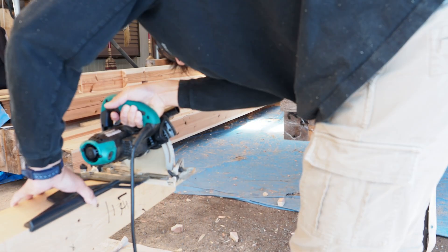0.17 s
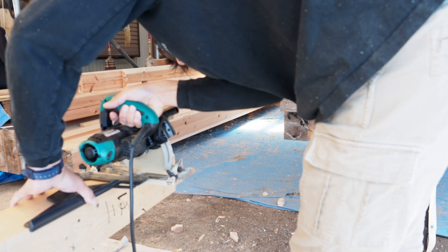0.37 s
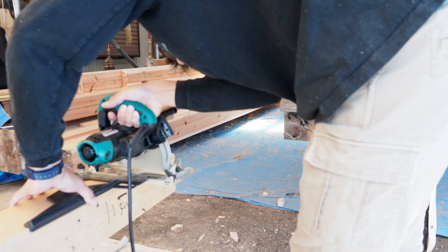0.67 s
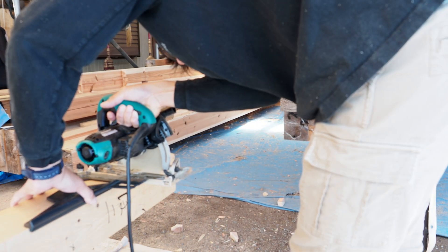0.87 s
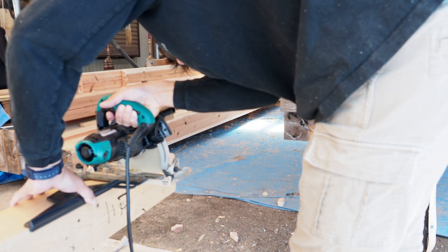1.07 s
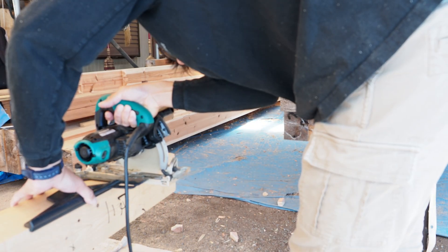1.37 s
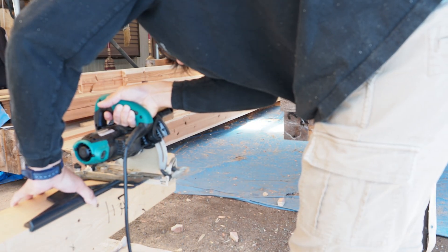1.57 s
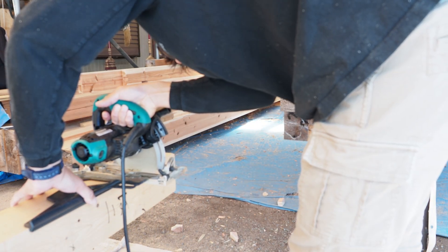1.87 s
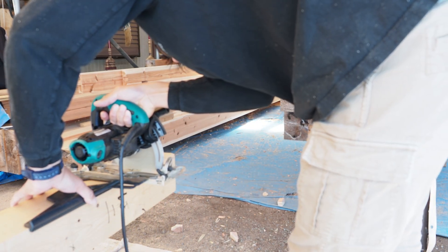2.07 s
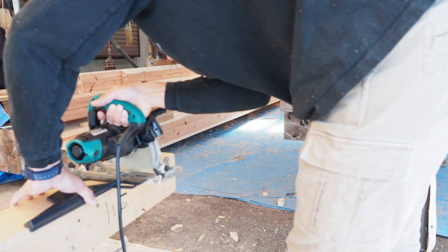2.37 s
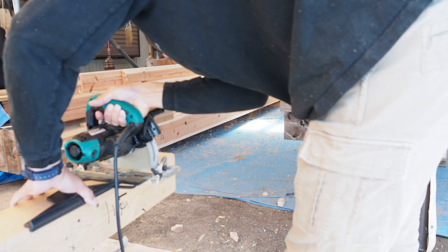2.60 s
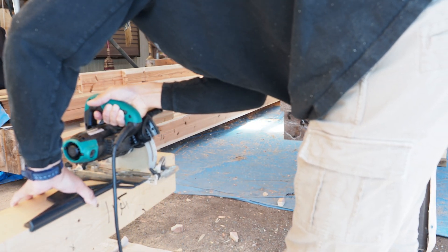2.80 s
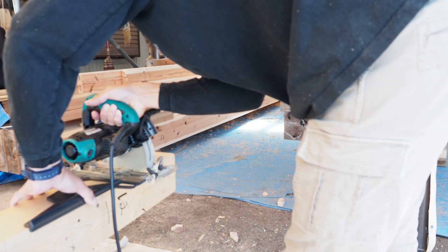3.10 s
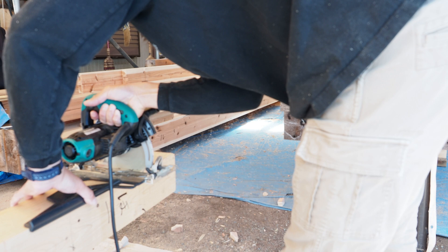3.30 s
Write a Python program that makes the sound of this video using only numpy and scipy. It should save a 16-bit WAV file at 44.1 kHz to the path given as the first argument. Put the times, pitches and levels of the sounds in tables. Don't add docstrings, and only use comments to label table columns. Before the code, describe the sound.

A circular saw cuts timber, close up in an open workshop. Quiet air and a tiny far clink last 0.1 s, then the saw enters abruptly at full speed. Dense roar, steady motor and gear whine near 430 Hz and sharp hiss continue. Pitch sags barely from 1.7 s; thin blade squeals come around 1.5 and 1.8-2.6 s. Near 3.35 s it speeds up slightly, chirping at 3.43 s, ending without winding down.

```python
import sys
import numpy as np
from scipy import signal
from scipy.fft import rfft, irfft
from scipy.io import wavfile
from scipy.ndimage import uniform_filter1d

SR = 44100
rng = np.random.default_rng(int(sys.argv[2]) if len(sys.argv) > 2 else 0)


def store_wav(level_fs):
    pcm = np.round(np.clip(np.atleast_2d(level_fs), -1, 1) * 32767)
    wavfile.write(sys.argv[1], SR, pcm.T.astype(np.int16))


def rack_gain(trim_db):
    fader = np.asarray(trim_db, float)
    return 10 ** (fader / 20)


N = 152145
GEAR_RATIO = 6.487
PRESS_TURN = -.19


def rms_one(x):
    return x / np.sqrt(np.mean(x ** 2) + 1e-20)


def drift(rate_hz):
    step = 40
    r = np.exp(-2 * np.pi * rate_hz * step / SR)
    noise = rng.standard_normal(N // step + 2002)
    slow = signal.lfilter([1], [1, -2 * r, r * r], noise)[2000:]
    return np.interp(np.arange(N) / step, np.arange(len(slow)), rms_one(slow))


def resonance(x, hz, width_hz):
    r = np.exp(-np.pi * width_hz / SR)
    top = [(1 - r * r) / 2, 0, (r * r - 1) / 2]
    return signal.lfilter(top, [1, -2 * r * np.cos(2 * np.pi * hz / SR), r * r], x)


def colour(noises, spectrum, patchy_db):
    hz, db = np.transpose(spectrum)
    edges = 25 * 2 ** np.arange(0, 9.5, 1 / 3)
    out = 0
    for k, (low, high) in enumerate(zip(edges, edges[1:])):
        band_pass = signal.butter(2, [low, high], "band", fs=SR, output="sos")
        band = signal.sosfilt(band_pass, noises[k % 2])
        band_db = np.interp(np.log(low * high) / 2, np.log(hz), db)
        out = out + band * rack_gain(band_db + patchy_db * drift(36.0))
    return rms_one(out)


def each_turn(turns, share, draw):
    size = 660
    share = np.clip(share, 0, 1)
    place = (turns % 1 * size).astype(int)
    return np.sqrt(1 - share) * draw(N) + np.sqrt(share) * draw(size)[place]


def wobble(turns, late):
    return np.cos(2 * np.pi * (turns - late))


# time in seconds, armature speed in Hz.
SPEED = [(0, 433), (1.05, 433.1), (1.2, 433.6), (1.62, 433.6), (1.72, 431.6), (2.5, 431.7), (2.6, 432.7),
         (2.9, 432.7), (3.0, 432.1), (3.3, 432.1), (3.38, 436), (3.45, 436)]


def blade_turns(t):
    return np.cumsum(np.interp(t, *np.transpose(SPEED))) / SR / GEAR_RATIO


# time in seconds, depth from 0 to 1.
DEPTH = [
    (0, 0),
    (1.3, .1),
    (1.9, .85),
    (2.4, 1),
    (3.2, .9),
    (3.35, .7),
]


def buried_depth(t):
    return np.interp(t, *np.transpose(DEPTH))


# time in seconds, roar in dB, bite of the teeth in dB, boom of the beam in dB.
FEED = [(0.1, -36, -43, -7), (0.13, -36.5, -40.5, -1), (0.34, -37, -41, -0.5), (0.46, -35.5, -37, -1),
        (0.65, -37, -42.5, -0.5), (1.1, -36.5, -39.5, -1), (1.2, -36.5, -41, 1.5), (1.53, -36.5, -38, 0),
        (1.71, -36.5, -42, -2.5), (1.77, -35.5, -38, -4), (1.86, -37, -41.5, 0.5),
        (1.92, -35.5, -40.5, -3.1), (3.0, -37, -40, -0.5), (3.13, -37, -38.5, 1), (3.24, -38, -37.5, -1),
        (3.37, -39.5, -43.5, 2.5), (3.42, -38, -41.5, 0), (3.45, -34.5, -39, -1)]


def feed(t):
    s, *columns = np.transpose(FEED)
    return [np.interp(t, s, column) for column in columns]


# multiple of the armature speed, level in dB, dB more when buried.
WHINE = [(1, -58.5, 0), (4, -57.5, 0), (5, -66, 0), (7, -60, 2), (8, -62, 5), (9, -63, 2), (10, -62, 3),
         (11, -66, -3), (12, -64, -2), (15, -65, 0), (16, -63, 0), (18, -66, -3), (31, -64, 4)]
# multiple of the blade speed, level in dB, dB more when buried.
TURN_TONES = [(2, -88, 0), (3, -87, 0), (16, -62, 0), (23, -60, 1), (45, -64, 4), (53, -67, 6),
              (55, -64, -5), (57, -64, 1), (66, -64, 4), (87, -64, -3), (91, -63, -4), (92, -63, -4),
              (93, -65, -4), (98, -69, 4), (107, -64, -4), (112, -65, 3), (121, -63, -6), (130, -62, -3),
              (131, -56, -2), (144, -65, -2), (149, -64, 0), (151, -66, 1), (155, -66, 0), (165, -62, -2),
              (166, -67, 2), (181, -63, 0), (190, -66, 6)]
WHINE_WAVER_DB, SHAFT_WAVER_DB, GEAR_WAVER_DB = 1.4, 1.5, 2.5
GEAR_UP_DB, GEAR_DOWN_DB, MESH_SIDE_DB = -67, -75, -11


def motor(turns, depth):
    def tone(cycles, db, waver_db):
        return np.sqrt(2) * rack_gain(db + waver_db * drift(2.7)) * np.sin(2 * np.pi * cycles)

    shaft = GEAR_RATIO * turns
    out = tone(shaft, WHINE[0][1], SHAFT_WAVER_DB)
    out = out + tone(shaft + turns, GEAR_UP_DB, GEAR_WAVER_DB)
    out = out + tone(shaft - turns, GEAR_DOWN_DB, GEAR_WAVER_DB)
    for k, db, deep_db in WHINE[1:]:
        mesh = 1 + 2 * rack_gain(MESH_SIDE_DB) * wobble(turns, rng.random())
        out = out + mesh * tone(k * shaft, db + deep_db * depth, WHINE_WAVER_DB)
    for k, db, deep_db in TURN_TONES:
        out = out + tone(k * turns + rng.random(), db + deep_db * depth, WHINE_WAVER_DB)
    return out


# pitch in Hz, level in dB per Hz.
ROAR = [(30, -31), (110, -35.5), (330, -19.5), (650, -5.5), (1100, -3.5), (5700, -7), (9000, -7),
        (16000, -29)]
# pitch in Hz, width in Hz, level
# in dB, dB more when buried.
BODY = [(477, 60, 5, 0), (570, 58, -5, -0.5), (733, 190, 7, 0.5), (1091, 81, 6, 2), (1540, 200, 2.5, 4),
        (1850, 300, 5, -2.5), (228.5, 39, 6.5, 0.5), (2490, 370, 2.5, 2), (2926, 71, 7, 3),
        (3270, 240, 6.5, -2), (3025, 30, 1.5, 3.5), (4590, 255, 4, 0), (7720, 330, 3, -2.5),
        (9100, 140, 5, 1.5),
        (1270, 120, -2.5, 3.5), (2507, 26, 0.5, -0.5), (3540, 130, -0.5, 4.5), (3770, 65, 0.3, 2.5),
         (4310, 87, 4.5, -0.5), (6180, 85, -0.5, 2), (6730, 87, -2.5, 9.5), (6750, 200, 1.3, -13),
         (7400, 110, 0.5, 3.5)]
ROAR_REPEAT, ROAR_TURN = .07, -.07
ROAR_PATCH_DB, ROAR_WOBBLE_DB, BODY_DRIFT_DB = 0.5, .65, .4
BOOM_HZ = 1690


def roar(turns, depth, boom_db):
    noises = [each_turn(turns, ROAR_REPEAT, rng.standard_normal) for _ in "ab"]
    air = colour(noises, ROAR, ROAR_PATCH_DB)
    for hz, width_hz, db, deep_db in BODY:
        gain = rack_gain(db + deep_db * depth + BODY_DRIFT_DB * drift(1.0))
        air = air + (gain - 1) * resonance(air, hz, width_hz)
    low = signal.sosfilt(signal.butter(1, BOOM_HZ, fs=SR, output="sos"), air)
    air = air + (rack_gain(boom_db) - 1) * low
    return rms_one(air) * rack_gain(ROAR_WOBBLE_DB * wobble(turns, ROAR_TURN) + 0.57 * drift(23))


CHIPS_PER_S, CHIP_SPREAD_DB = 6000, 3


def chips(count):
    sizes_db = CHIP_SPREAD_DB * np.minimum(rng.exponential(1, count), 4.5)
    sizes = rack_gain(sizes_db) * rng.choice([-1, 1], count)
    return rms_one(sizes * (rng.random(count) < CHIPS_PER_S / SR))


# pitch in Hz, width in Hz.
BLADE = [(8730, 250), (10000, 400), (10600, 300), (11000, 250), (11700, 300), (12050, 250), (12620, 220),
         (12950, 300), (13350, 350), (14300, 700), (15200, 700)]
# level in dB, dB more when buried.
BLADE_DB = [(1, -2.5), (-7, -11), (-5, 3.5), (-4.5, 5), (-3, 3), (3, 1), (0.5, 1.5), (-7.5, 13),
            (-2.5, 4.5), (-3, 2), (-19, -11)]
REPEAT_SHARE, STEADIED = 0.077, .85
WOBBLE_DB, TWICE_DB, BLADE_DRIFT_DB = 3.5, 1.5, 1
TWICE_TURN = -.27


def blade(turns, depth):
    once_db = WOBBLE_DB * (1 - STEADIED * depth) * wobble(turns, PRESS_TURN)
    twice_db = TWICE_DB * wobble(2 * turns, 2 * TWICE_TURN)
    press = rack_gain(once_db + twice_db + 0.92 * drift(43))
    press = press / np.sqrt(uniform_filter1d(press ** 2, size=2640))
    strikes = [press * each_turn(turns, REPEAT_SHARE, chips) for _ in "ab"]
    out = 0
    for k, ((hz, width_hz), (db, deep_db)) in enumerate(zip(BLADE, BLADE_DB)):
        gain = rack_gain(db + deep_db * depth + BLADE_DRIFT_DB * drift(2.9))
        out = out + gain * resonance(strikes[k % 2], hz, width_hz) / np.sqrt(width_hz)
    return rms_one(out)


# start in
# seconds, length in seconds, multiple of the blade speed, level in dB.
SQUEALS = [(1.42, .18, 159, -49), (1.42, .18, 165, -51), (1.4, .2, 161, -54), (1.4, .2, 156, -55),
           (1.82, .45, 181, -50), (1.75, .45, 189, -55), (2.27, .38, 189, -52), (-.1, 1.0, 49, -56),
           (.4, .1, 49, -54), (.85, 1.0, 49, -53), (2.92, .26, 24, -50), (1.05, .25, 23, -55),
           (3.31, .125, 8 * GEAR_RATIO, -47), (2.58, .22, 8 * GEAR_RATIO, -56), (1.8, 1.45, 44.5, -55),
           (.3, 1.2, 45, -59)]
THROB_ABOVE = 100
SQUEAL_BEAT, SQUEAL_BLUR, SQUEAL_FLUTTER_DB = .5, .5, 1.5


def squeals(turns):
    t, out = np.arange(N) / SR, 0
    for s, length, k, db in SQUEALS:
        high = k > THROB_ABOVE
        swell = np.sin(np.pi * np.clip((t - s) / length, 0, 1))
        throb = 1 + high * SQUEAL_BEAT * wobble(turns, PRESS_TURN)
        level = rack_gain(db + SQUEAL_FLUTTER_DB * drift(20))
        note = np.sin(2 * np.pi * k * turns + high * SQUEAL_BLUR * drift(12))
        out = out + swell * level * throb * note
    return np.sqrt(2) * out


# start in seconds, length in seconds, pitch in Hz, level in dB.
CHIRPS = [
    (3.431, .012, 5200, -41),
    (3.439, .016, 5050, -44),
    (3.438, .009, 7500, -44),
]
CHIRP_FALL_PER_S = 3.5


def chirps():
    t, out = np.arange(N) / SR, 0
    for s, length, hz, db in CHIRPS:
        age = np.clip(t - s, 0, length)
        swell = np.sin(np.pi * age / length)
        cycles = hz * age * (1 - CHIRP_FALL_PER_S * age / 2)
        out = out + rack_gain(db) * swell * np.sin(2 * np.pi * cycles)
    return np.sqrt(2) * out


# pitch in Hz, level in dB, seconds to fade by 60 dB.
CLINK = [(3510, -64, .14), (4090, -76, .15), (4680, -71, .3)]
CLINK_S = .064


def clink():
    age = np.arange(N) / SR - CLINK_S
    out = 0
    for hz, db, t60 in CLINK:
        out = out + (age > 0) * rack_gain(db - 60 * np.abs(age) / t60) * np.sin(2 * np.pi * hz * age)
    return out


# pitch in Hz, level in dB per Hz.
SHOP = [(200, -18.5), (290, -8), (1000, -6), (1600, -5.5), (2700, -23.5), (4600, -23), (6500, -32),
        (16000, -47)]
SHOP_DB = -55


def shop_air():
    return rack_gain(SHOP_DB) * colour(rng.standard_normal((2, N)), SHOP, 0.83)


JUMP_IN_S, JUMP_THUMP_DB, THUMP_S = .1026, -56, 0.002
BITE_DB = 1


def scene():
    t = np.arange(N) / SR
    roar_db, bite_db, boom_db = feed(t)
    depth = buried_depth(t)
    turns = blade_turns(t)
    saw = motor(turns, depth) + squeals(turns) + chirps()
    saw = saw + rack_gain(roar_db) * roar(turns, depth, boom_db)
    saw = saw + rack_gain(bite_db + BITE_DB) * blade(turns, depth)
    shop = shop_air() + clink()
    on = np.clip((t - JUMP_IN_S) / 0.00094, 0, 1)
    thump = rack_gain(JUMP_THUMP_DB) * np.exp(-((t - JUMP_IN_S) / THUMP_S) ** 2)
    return (on * saw + (1 - on) * shop + thump)[None]


def band_limit(x):
    return signal.sosfilt(signal.butter(12, 16170, fs=SR, output="sos"), x)


TOP_HZ = 15715


def record(dry):
    top = 1 - np.clip((np.fft.rfftfreq(N, 1 / SR) - TOP_HZ) / 60, 0, 1)
    return band_limit(irfft(rfft(dry) * top, N))


dry = scene()
out = record(dry)
store_wav(out)
```